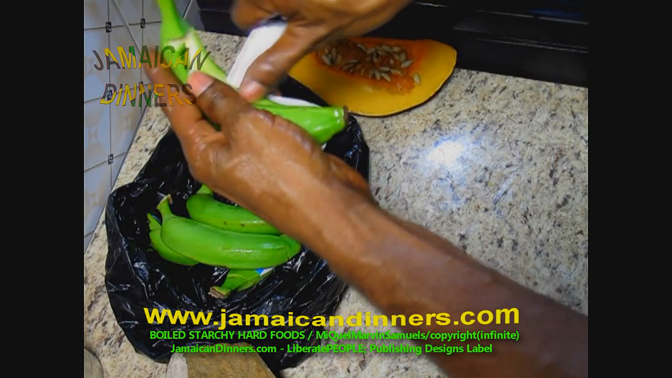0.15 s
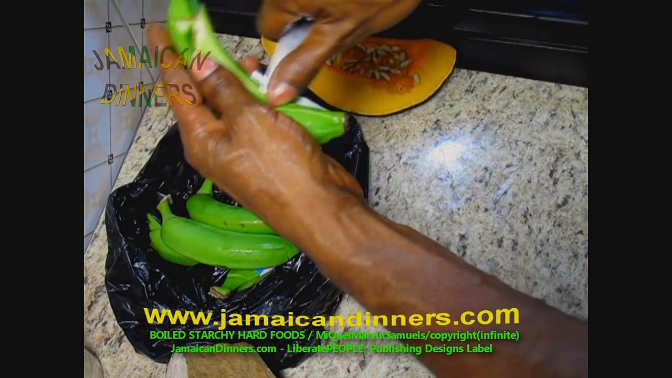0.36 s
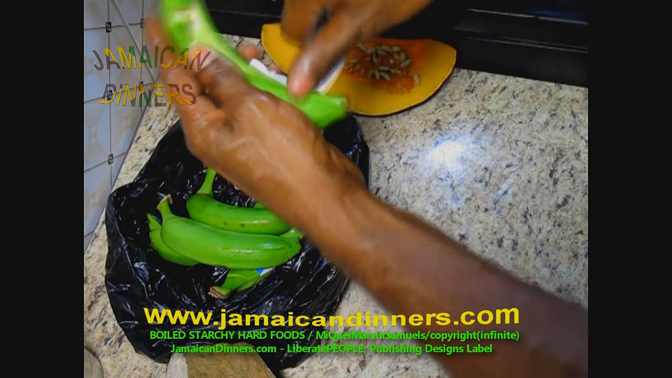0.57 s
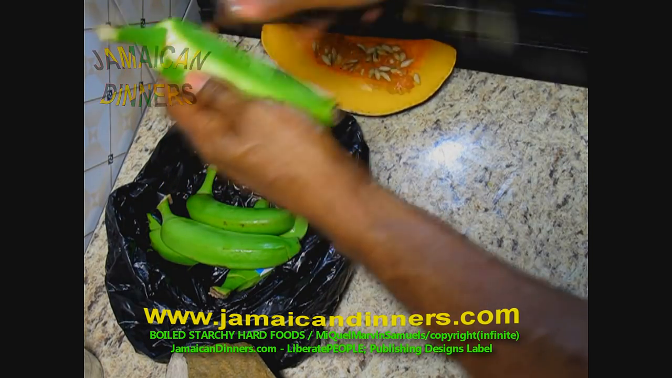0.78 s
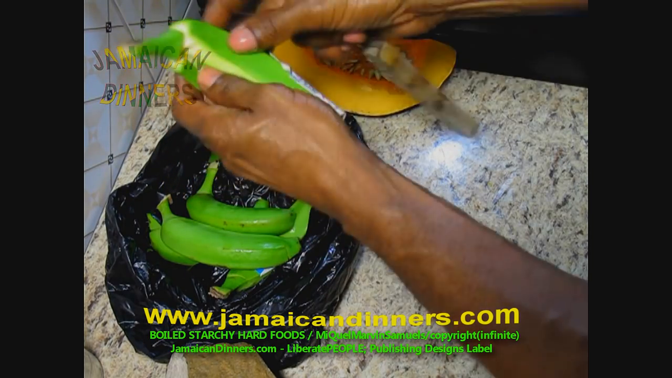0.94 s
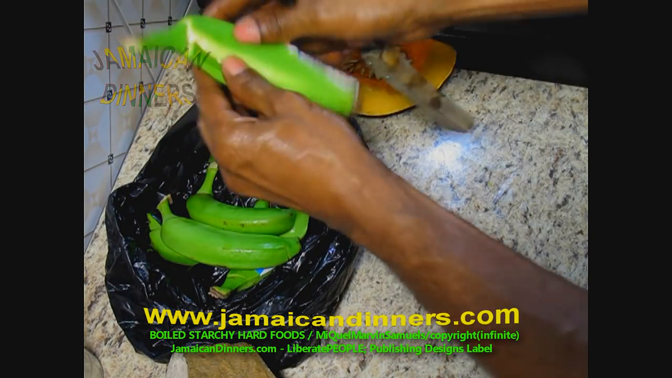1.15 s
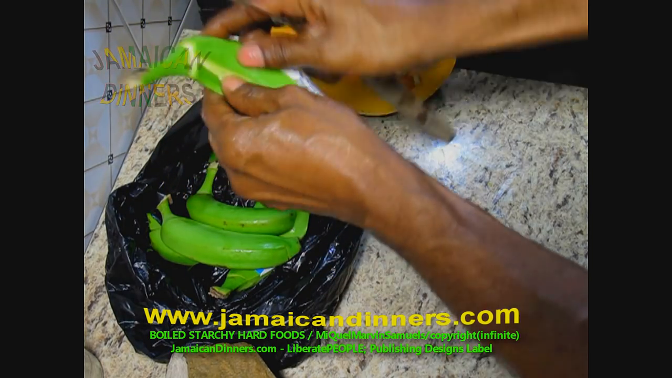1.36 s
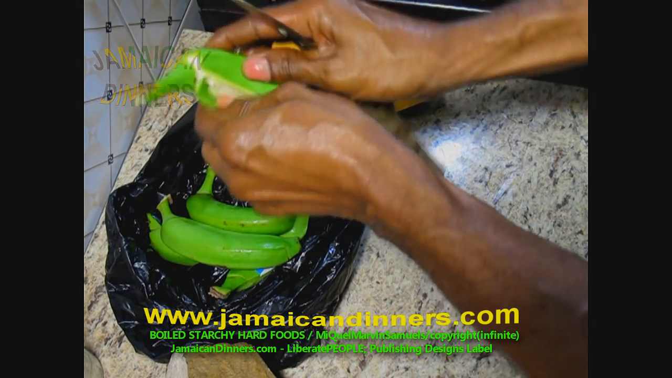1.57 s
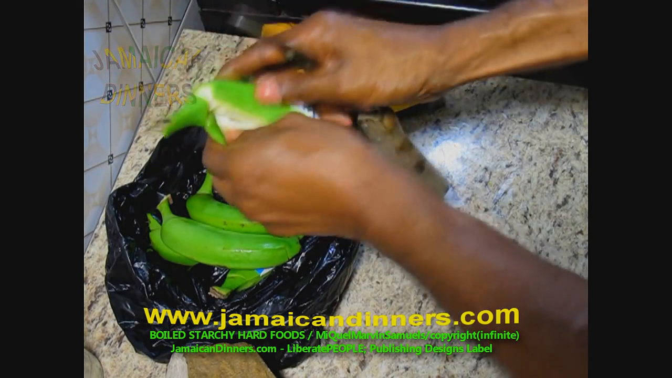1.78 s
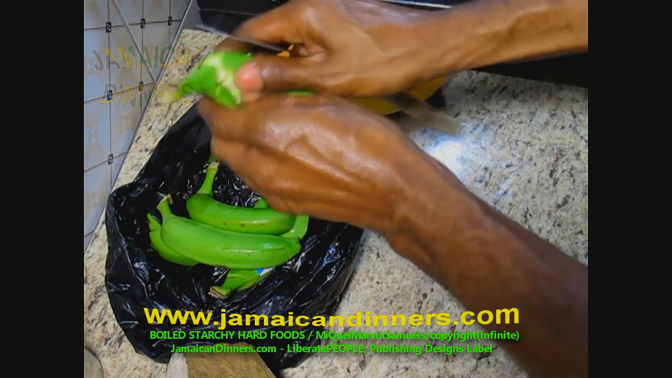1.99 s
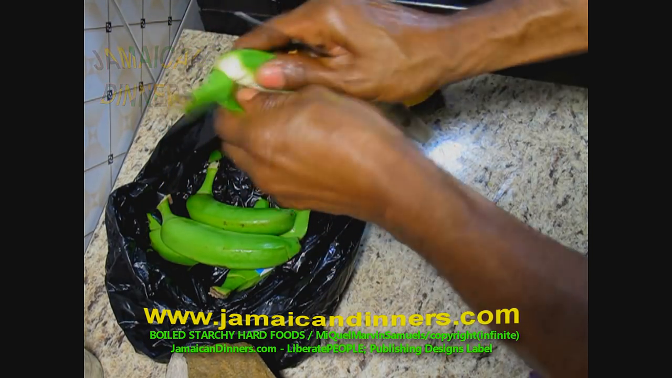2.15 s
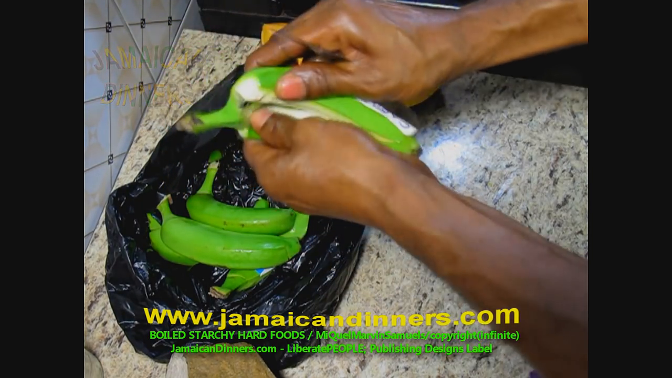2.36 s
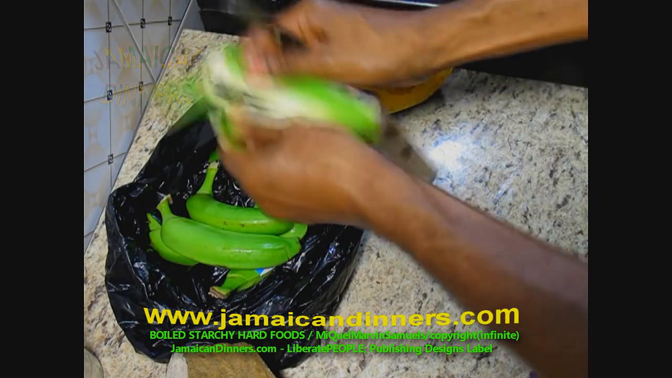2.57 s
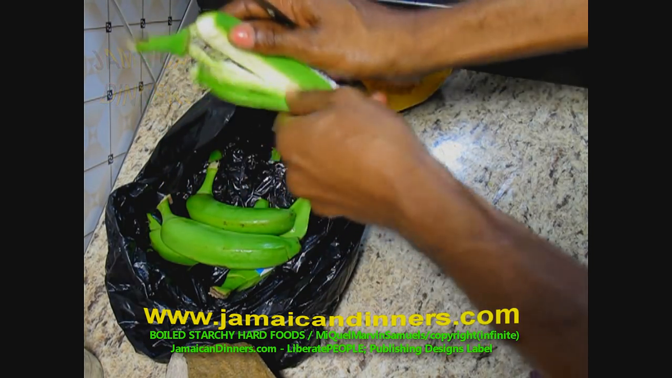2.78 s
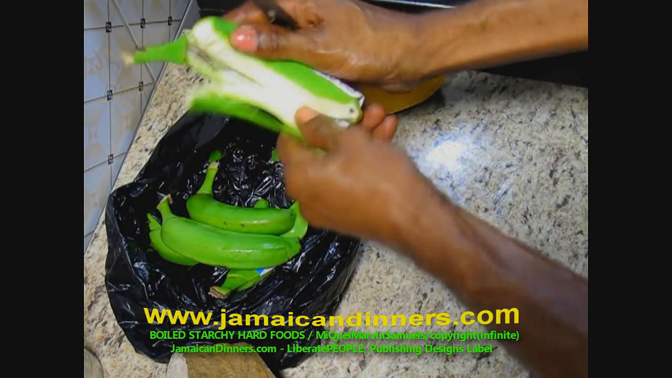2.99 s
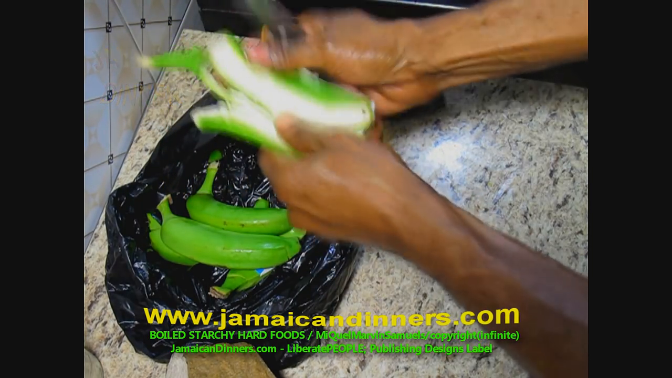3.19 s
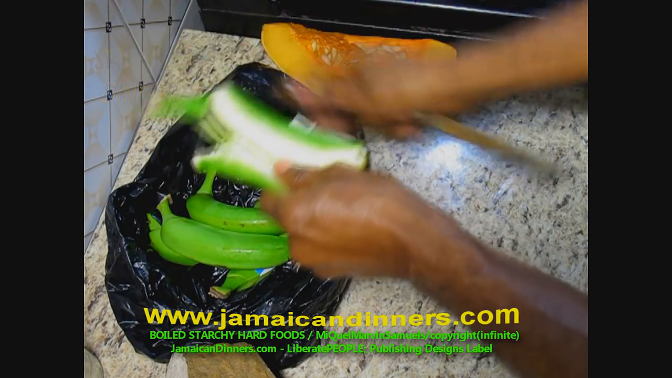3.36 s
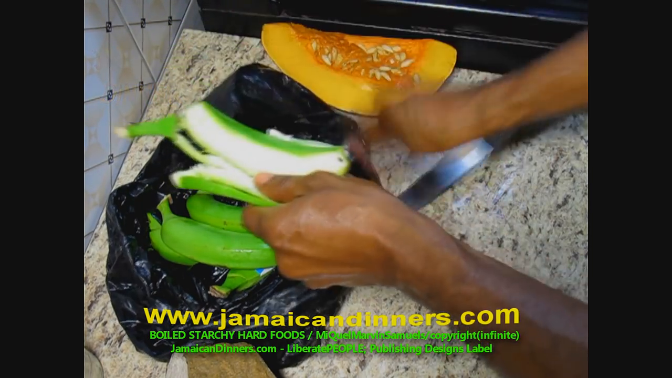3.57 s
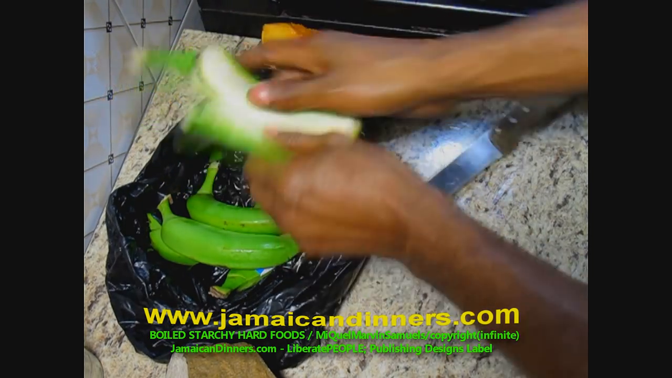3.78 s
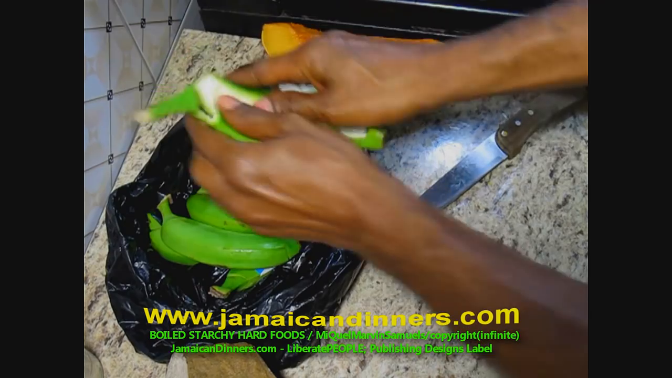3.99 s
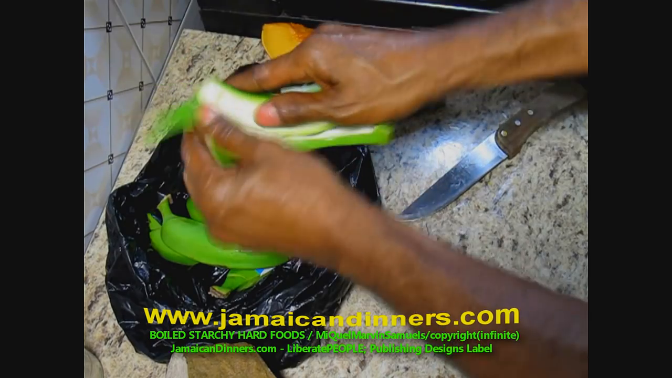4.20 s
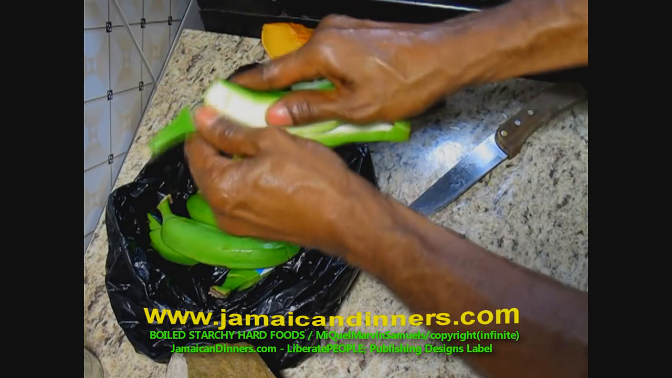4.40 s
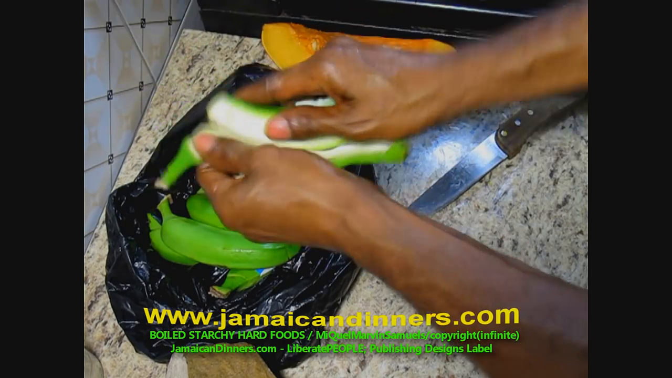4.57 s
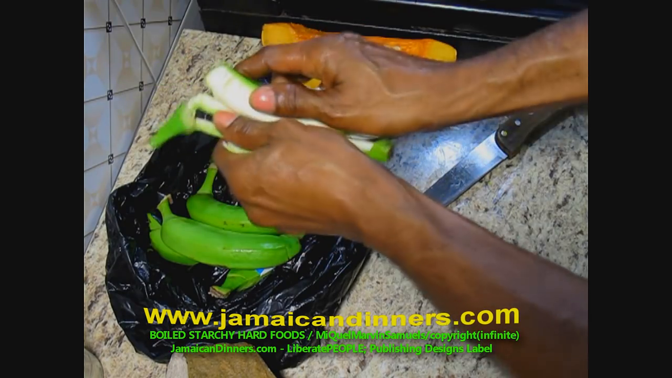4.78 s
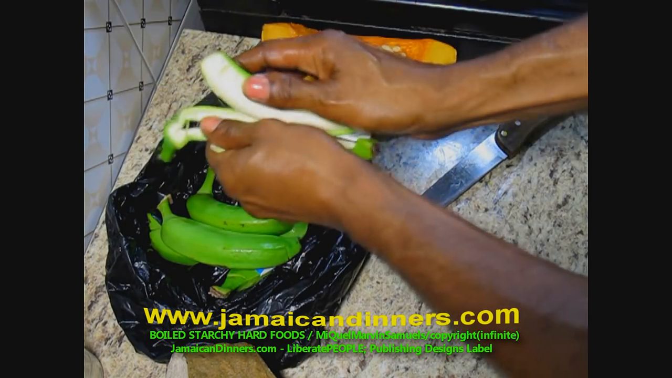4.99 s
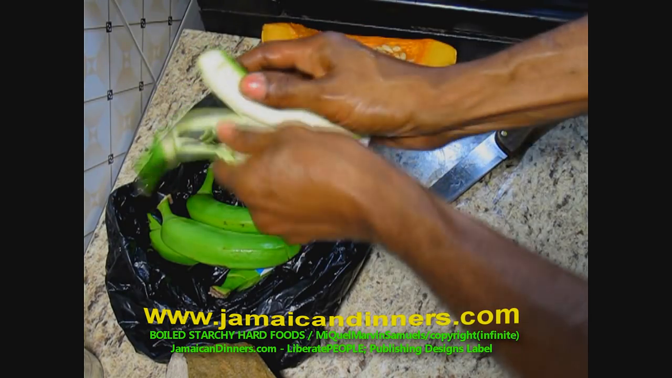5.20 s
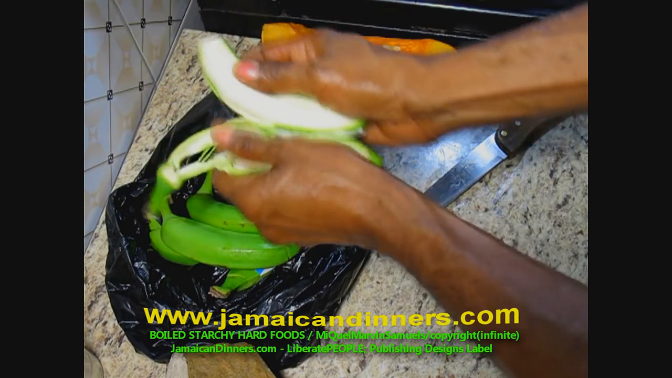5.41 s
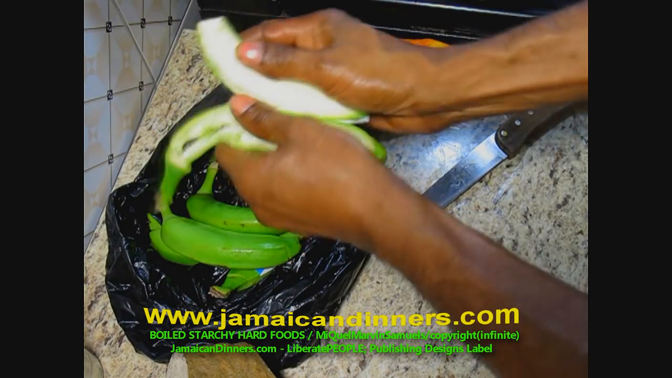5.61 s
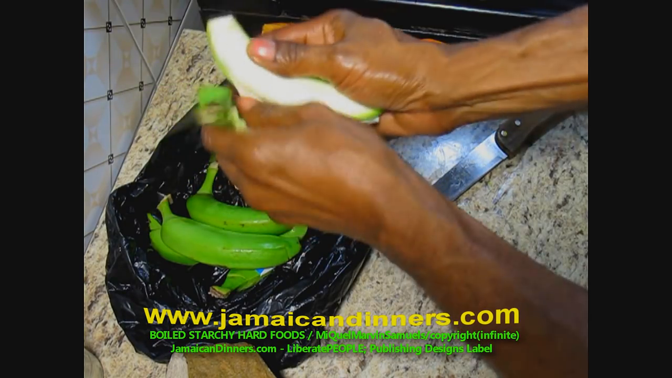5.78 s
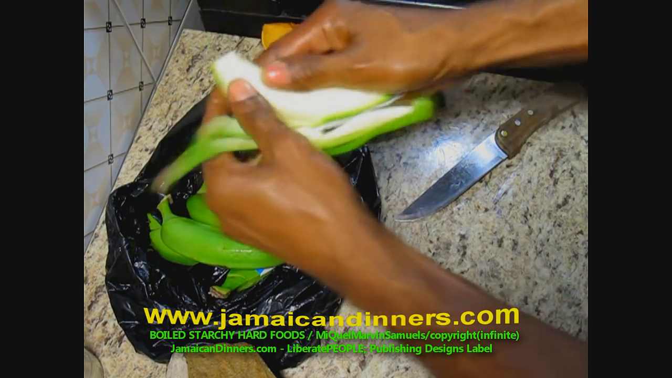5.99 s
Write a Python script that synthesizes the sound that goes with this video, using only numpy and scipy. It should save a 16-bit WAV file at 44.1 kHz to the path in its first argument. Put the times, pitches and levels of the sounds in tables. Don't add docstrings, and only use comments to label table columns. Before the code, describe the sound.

In a quiet kitchen with faint fridge hum and hiss, fingers softly pat and tear a thick green banana skin. Crackles and snaps grow into short, crisp rips. Midway a knife drops on the stone counter, bounces, skids and rattles to rest, by far the loudest event. Tearing then resumes in bursts, strongest near the end, before fading to small ticks. Close small camera, slightly dull and gritty, with a short room tail.

```python
import sys
import numpy as np
from scipy import signal
from scipy.fft import rfft, irfft
from scipy.io import wavfile
from scipy.ndimage import uniform_filter1d

SR = 44100
rng = np.random.default_rng(int(sys.argv[2]) if len(sys.argv) > 2 else 0)


def gain_from_decibels(decibels):
    exponent = np.asarray(decibels, float) / 20
    return 10 ** exponent


def wav_record(signal):
    frames = np.transpose(np.atleast_2d(signal))
    bounded = np.clip(frames, -1, 1)
    quanta = np.round(bounded * 32767).astype(np.int16)
    wavfile.write(sys.argv[1], SR, quanta)


N = 266805

# f/Hz, width/Hz, level/dB
CRACK_PEAKS = [(5740, 3220, -8), (7560, 2000, -2), (9880, 1760, -1)]
# f/Hz, level/dB, time to fall 60 dB/s
HANDLE_MODES = [(740, -13, .04), (884, 0.5, 0.062), (1014, -7, 0.092), (1170, 2, 0.038), (1530, 3, 0.028),
                (1770, 13.5, 0.013), (2050, 10, 0.022), (2440, 9.5, 0.024)]
# f/Hz, level/dB, time to fall 60 dB/s
EDGE_MODES = [(7830, 0, 0.029), (10260, 10, 0.017)]


def level(x, db):
    return x * gain_from_decibels(db) / np.sqrt(np.mean(x ** 2))


def band(x, lo_hz, hi_hz, order=2):
    return signal.sosfilt(signal.butter(order, [lo_hz, hi_hz], "band", fs=SR, output="sos"), x)


def resonator(hz, width_hz):
    r = np.exp(-np.pi * width_hz / SR)
    poles = [1, -2 * r * np.cos(2 * np.pi * hz / SR), r * r]
    return np.array([1, 0, -1]) * (1 - r * r) / 2, poles


def body(x, peaks):
    out = 0
    for k, (hz, width_hz, db) in enumerate(peaks):
        out = out + (-1) ** k * gain_from_decibels(db) * signal.lfilter(*resonator(hz, width_hz), x)
    return out


def sweep(x, hz, sharp):
    out, state, size = np.zeros(N), np.zeros(2), 256
    for at in range(0, N, size):
        zeros, poles = resonator(hz[at], hz[at] / sharp)
        out[at:at + size], state = signal.lfilter(zeros, poles, x[at:at + size], zi=state)
    return out


def ring(x, modes, scatter_db=6.0):
    out = 0
    for hz, db, t60 in modes:
        actual_hz = hz * (1 + 0.016 * rng.standard_normal())
        pole = np.exp(2j * np.pi * actual_hz / SR - np.log(1000) / (t60 * SR))
        strength = gain_from_decibels(db + scatter_db * rng.standard_normal())
        out = out + strength * signal.lfilter([1], [1, -pole], x).imag
    return out * x.std() / out.std()


def grains(rate, spread_db, smooth_db):
    when, size, noise = rng.random(N), rng.exponential(size=N), rng.standard_normal(N)
    ticks = (when < rate / SR) * gain_from_decibels(spread_db * np.minimum(size, 3.2)) * np.sign(noise)
    return level(level(ticks, 0) + level(rng.standard_normal(N), smooth_db), 0)


def blows(rows, voices, tick, ragged_db=3.5):
    span = 3072
    out, t = np.zeros(N + span), np.arange(span) / SR
    for s, db, rel_a, rel_b, t60, *hz in rows:
        unevenness = np.repeat(rng.standard_normal(span // 32), 32) * np.minimum(t / 0.0041, 1)
        ragged = rng.standard_normal(span) * gain_from_decibels(ragged_db * unevenness)
        burst = ragged * np.exp(-np.log(1000) * t / np.clip(t60, .003, .08))
        burst *= 1 + 0.56 * np.exp(-t / 0.0021)
        burst[0] += tick
        at = int(s * SR)
        for voice, part_db in zip(voices, (db, db + rel_a, db + rel_b)):
            sound = voice(burst, *hz)
            out[at:at + span] += sound * gain_from_decibels(part_db) / np.abs(sound).max()
    return out[:N]


def singing(rows, sharp):
    damping_hz, strike = 134, 7.4
    out, t = np.zeros(N + SR), np.arange(4410) / SR
    for s, length, db, hz in rows:
        unevenness = np.repeat(rng.standard_normal(len(t) // 45), 45)
        ticks = rng.standard_normal(len(t)) * gain_from_decibels(2.3 * unevenness)
        ticks[10] += strike
        fade = gain_from_decibels(-6 * t / length - 1400 * np.maximum(t - length, 0))
        shape = np.minimum(t / 0.00046, 1) * fade
        peak = [(hz, hz / sharp + damping_hz, 0)]
        note = body(body(ticks * shape, peak), peak)
        at = int(s * SR)
        out[at:at + len(t)] += level(note, db) * np.sqrt(length / t[-1])
    return out[:N]


def background():
    # f/Hz, level/dB
    hiss_colour = np.array([(20, -5), (60, -6), (150, -7), (330, -8.5), (600, -12), (1500, -14.5),
                            (2100, -15.5), (4000, -19), (7000, -23), (9800, -19), (11000, -25)])
    hum_hz, whine_hz = 99.9, 5910
    hiss_db, hum_db, whine_db = -56.5, -58.5, -73
    t, hz = np.arange(N) / SR, np.fft.rfftfreq(N, 1 / SR) + 1
    shape_db = np.interp(np.log(hz), np.log(hiss_colour[:, 0]), hiss_colour[:, 1])
    hiss = irfft(rfft(rng.standard_normal(N)) * gain_from_decibels(shape_db), N)
    waver = level(band(rng.standard_normal(N), hum_hz - 4, hum_hz + 4), -17.5)
    hum = np.sqrt(2) * np.sin(2 * np.pi * hum_hz * t) + waver
    whine = np.sin(2 * np.pi * whine_hz * t)
    return level(hiss, hiss_db) + level(hum, hum_db) + level(whine, whine_db)


def pulls():
    # peak t/s, crackle level/dB, build-up per 30 dB/s, skin relative level/dB, flap f/Hz
    rips = [(0.536, -42, 0.08, -6, 2200), (.68, -49.5, 0, -6.5, 3290), (2.829, -55, -0.36, -1, 3500),
            (1.74, -31, 0, -12.5, 3980), (1.95, -57.5, .11, 1, 3700), (2.182, -39.5, -0.04, -8, 3500),
            (2.257, -37, -0.03, -3.5, 3730), (2.319, -37.5, 0.04, -3, 2750), (2.397, -42.5, 0, -3, 3450),
            (2.502, -34.5, -0.0141, -7.5, 2280), (2.568, -40, 0.21, -7, 2060),
            (3.018, -30, 0.1043, -7, 3360), (3.266, -30, 0.0435, -7, 3850),
            (4.585, -38.5, 0.12, -11.5, 3830), (4.64, -46, 0.36, -13, 4500), (5.015, -46, -0.08, -8, 3400),
            (5.092, -59, 0.5, -10, 4000), (5.363, -31.5, 0.0653, -3, 2440), (5.724, -57, 0.16, -6, 2590),
            (5.303, -29.5, 0.05, -11.5, 2530), (6.006, -59.5, 1, -8, 2990)]
    # start t/s, length/s, crackle level/dB, skin relative level/dB, flap f/Hz
    drags = [(0.06, 0.079, -54.5, -1.5, 2080), (0.21, 0.06, -56.5, -2, 2190),
             (0.304, 0.12, -59.5, -6.5, 2490), (0.976, 0.025, -54, -4.5, 4600),
             (1.508, 0.15, -50.5, -12.5, 3500), (4.422, 0.11, -49.5, -12, 3850),
             (5.836, 0.027, -43.5, -15, 4600), (1.606, 0.15, -42.5, -15, 4000),
             (2.003, 0.07, -57, -8, 2800), (2.159, .025, -46.5, -6.5, 3400), (2.283, 0.022, -38, -10, 3000),
             (2.37, 0.033, -41, -9.5, 2790), (2.726, 0.022, -57, -6, 3480),
             (4.958, 0.093, -43.5, -12.5, 3700), (2.412, 0.035, -42.5, -8.5, 2760),
             (2.643, 0.045, -59, -7, 2880), (3.105, .13, -56.5, -6, 3400), (3.308, 0.061, -56.5, -1, 3800),
             (4.7, 0.11, -60, -8, 2760), (4.888, 0.061, -36.5, -12.5, 4000), (5.172, 0.16, -53, -5, 3000),
             (5.33, 0.031, -33, -13, 2500), (5.44, 0.1, -58.5, -3, 2600)]
    drag_attack_s, build_curve, release_db_per_s = 0.027, 1.33, 337
    t = np.arange(0, N + 64, 64) / SR
    rows = [(s, 0, db, rise, *rest) for s, db, rise, *rest in rips]
    rows += [(s, hold, db, drag_attack_s, *rest) for s, hold, db, *rest in drags]
    s, hold, db, rise, skin_db, flap_hz = np.array(rows).T[:, :, None]
    early, late = np.maximum(s - t, 0), np.maximum(t - s - hold, 0)
    build_db = 30 * (early / np.maximum(rise, .005)) ** build_curve
    power = gain_from_decibels(np.maximum(db - build_db - release_db_per_s * late, -150)) ** 2
    total = power.sum(0)
    crackle_db = 10 * np.log10(total)
    skin_share_db = (power * skin_db).sum(0) / total
    flap_pitch_hz = (power * flap_hz).sum(0) / total
    return [np.interp(np.arange(N) / SR, t, c) for c in (crackle_db, skin_share_db, flap_pitch_hz)]


def tearing():
    # f/Hz, width/Hz, level/dB
    skin_peaks = [(2210, 860, -4.5), (1080, 550, -11.5), (3700, 3700, -6), (5720, 2830, -1)]
    crackle_db, skin_db, flap_hz = pulls()
    fibres = grains(rate=3000., spread_db=4.0, smooth_db=-6.0)
    coarse = fibres + grains(rate=1300.0, spread_db=4.5, smooth_db=-7.5)
    patch_hz = np.repeat(4500 + 5500 * rng.random(N // 1024 + 1), 1024)[:N]
    bright = level(body(fibres, CRACK_PEAKS), -1.3) + level(sweep(fibres, patch_hz, 4.8), -13.0)
    skin = level(body(coarse, skin_peaks), 0.57) + level(sweep(coarse, flap_hz, 4.5), -7.5)
    return gain_from_decibels(crackle_db - 1.5) * (bright + gain_from_decibels(skin_db) * skin)


def snaps():
    # t/s, crack level/dB, flap relative level/dB, 60 dB fall/s
    thick_snaps = [(.0418, -46, 1, 0.034), (4.685, -47, 3, .02), (.535, -45, 6, .05),
                   (.976, -40, -4.5, 0.031), (1.1506, -54, 13, .023), (1.943, -38.5, -2.5, 0.043),
                   (2.148, -43, -12, .02), (2.3165, -21, -1, 0.028), (2.3693, -33, -14, .023),
                   (2.4204, -29.5, -2, 0.046), (2.5603, -23, -0.5, 0.022), (2.6517, -42, -1, 0.039),
                   (2.944, -32, -3, 0.051), (2.9697, -36, 1, 0.018), (3.015, -14, -3, 0.0088),
                   (3.025, -22, -1, 0.026), (4.905, -27, -9, 0.02), (4.926, -36.5, 7, 0.025),
                   (5.009, -17.5, -7.5, 0.021), (5.1432, -24.5, -16, 0.045), (5.1659, -28.5, 2.5, 0.029),
                   (5.2058, -26, -1.5, 0.038), (5.151, -41.5, 10.5, .02), (5.265, -29.5, -11, 0.023),
                   (5.33, -20.5, -4, .02), (5.2923, -16.5, -5.5, 0.061), (5.3602, -11.5, -7, 0.012),
                   (5.8605, -30, -17, 0.05)]
    # t/s, crack level/dB, flap relative level/dB, 60 dB fall/s
    thin_snaps = [(.671, -31.5, -21, 0.033), (.7877, -31, -5, 0.024), (1.2541, -46.5, 7, 0.0058),
                  (1.5237, -43, -3, .02), (1.614, -34, -13, 0.037), (1.6798, -31, -18, .02),
                  (1.7332, -17, -6, 0.011), (1.7455, -24.5, -3.5, 0.023), (2.1795, -21, -6.5, 0.025),
                  (2.2545, -25.5, -5, 0.03), (2.2893, -32, -5.5, 0.045), (2.395, -21.5, -23, .022),
                  (2.527, -30.5, 1.5, 0.013), (2.824, -46, -1, 0.05), (2.9868, -19, -7, 0.062),
                  (3.0779, -28.5, -12, .023), (3.242, -25.5, -2.5, 0.055), (3.248, -15, 0.5, 0.059),
                  (3.2682, -7, -4, 0.017), (3.276, -35, 8, 0.09), (4.0893, -43, -3, 0.022),
                  (4.4938, -33, 0.5, 0.022), (4.5164, -31.5, -4, 0.04), (4.5284, -26, -10, 0.047),
                  (4.557, -32.5, -4, 0.018), (4.6438, -29, -12, 0.042), (5.3557, -16.5, -4, .012)]
    # t/s, crack level/dB
    dry_ticks = [(1.624, -28), (1.6427, -32), (1.696, -29), (2.4929, -24), (2.7195, -44), (2.922, -49),
                 (3.116, -34.5), (3.226, -36), (4.431, -29), (4.5765, -25), (4.601, -31), (4.8496, -41),
                 (4.864, -32), (4.882, -35), (4.9406, -26), (4.9552, -20.5), (4.989, -29), (5.044, -24.5),
                 (5.2868, -24), (5.7158, -37.5), (5.8365, -33), (5.9725, -45), (5.998, -36.5), (1.663, -36),
                 (4.462, -42), (4.978, -28), (5.35, -24), (2.567, -25.5), (2.302, -27), (2.458, -31.5),
                 (2.249, -38), (2.262, -32), (5.25, -42), (3.037, -31)]
    thick_hz, thin_hz, flap_width = 2200, 3800, .12
    flesh_db, tick_flap_db, tick_t60_s = -45, -37, 0.03

    def crack(x, hz):
        return body(x, CRACK_PEAKS)

    def flap(x, hz):
        return body(x, [(hz, flap_width * hz, 0)]) + .5 * band(x, 1960, 5740)

    def flesh(x, hz):
        return band(x, 250, 1600)

    rows = [(s, db, flap_db, flesh_db, t60, thick_hz) for s, db, flap_db, t60 in thick_snaps]
    rows += [(s, db, flap_db, flesh_db, t60, thin_hz) for s, db, flap_db, t60 in thin_snaps]
    rows += [(s, db, tick_flap_db, flesh_db, tick_t60_s, thin_hz) for s, db in dry_ticks]
    return blows(rows, (crack, flap, flesh), tick=2.4)


def singing_strips():
    strips = [(.068, 0.018, -60, 2050), (.215, .03, -64, 2050), (.51, .05, -52, 2240),
              (1.612, 0.021, -45, 9300), (1.613, .025, -57, 3500), (1.645, 0.003, -37, 9500),
              (1.70, 0.033, -45.5, 10200), (1.70, 0.025, -52, 6300), (2.168, .01, -42, 9550),
              (2.185, 0.0094, -48, 3940), (2.29, 0.006, -42, 6100), (2.315, .005, -31, 8300),
              (2.742, 0.02, -57, 3800), (2.325, 0.02, -54, 2860), (2.421, .004, -34, 10000),
              (2.493, 0.021, -40.5, 8950), (2.503, 0.017, -45, 2180), (2.555, 0.021, -40.5, 10100),
              (2.968, .012, -43.5, 2330), (2.985, 0.015, -41, 4330), (3.0, 0.0078, -39, 2070),
              (3.014, 0.0036, -27, 8260), (2.92, .025, -55, 3500), (3.045, 0.01, -44, 2370),
              (3.25, 0.06, -39, 3800), (3.248, .012, -34, 7000), (4.51, 0.025, -51, 5600),
              (4.555, 0.031, -46.5, 4096), (4.55, 0.083, -45, 9700), (4.595, 0.027, -56, 1980),
              (4.643, 0.006, -48, 5400), (4.863, .07, -45.5, 9400), (4.885, .04, -51, 5300),
              (4.902, 0.027, -41, 7200), (4.973, 0.008, -39, 9500), (5.009, 0.011, -33, 7240),
              (5.054, .006, -40, 9350), (5.293, .006, -31, 6750), (5.292, 0.012, -37, 5200),
              (5.30, 0.083, -37, 9440), (5.326, 0.014, -43, 2100), (5.361, 0.008, -36.5, 2420),
              (5.362, 0.011, -36, 5130), (5.374, 0.0035, -38, 2800), (5.37, 0.033, -49, 1160),
              (3.267, .004, -20, 10500), (.788, 0.0089, -55, 3900), (5.009, .006, -32, 4700),
              (1.15, .004, -54, 2520), (5.356, 0.016, -50, 400)]
    return singing(strips, sharp=8.2)


def finger_pats():
    # t/s, level/dB, f/Hz
    pats = [
        (0.254, -49, 1360),
        (0.259, -47, 610),
        (0.356, -45, 990),
        (0.275, -50, 650),
        (0.541, -46, 1400),
        (0.649, -48, 2050),
        (1.089, -50, 740),
        (1.9765, -44.5, 2600),
    ]
    rows = [(s, db, 0, 0, .03, hz) for s, db, hz in pats]
    return blows(rows, [lambda x, hz: band(x, 0.81 * hz, 1.23 * hz)], tick=1.9)


def clicks():
    # t/s, peak level/dB, f/Hz, length/cycles
    contacts = [(0.7879, -30, 3700, 2.5), (.7935, -38, 9500, 5), (2.7195, -43, 2700, 4),
                (.2545, -46, 1200, 3), (.358, -42, 1250, 3), (3.0148, -17, 7450, 3), (1.7333, -14, 8500, 3),
                (2.318, -14, 2900, 2.5), (4.6015, -29, 10500, 6), (3.5924, -1, 1940, 2.3),
                (3.6022, -17, 1600, 2.5), (3.6483, -7.5, 4300, 3.9), (3.7405, -12, 2600, 1.5),
                (3.7703, -6, 3570, 2), (3.7835, -10.5, 2800, 4), (3.8707, -6.5, 4300, 3),
                (3.8725, -15, 1550, 3.7), (3.9255, -17, 4100, 5), (4.9408, -25, 8000, 6),
                (4.956, -20, 7600, 5.5), (4.9738, -25, 9400, 8), (4.9786, -24, 9500, 8),
                (5.0096, -22.5, 2140, 4.3), (5.2948, -23, 2130, 4), (5.3257, -24, 5000, 2),
                (5.3556, -17, 2310, 2.5), (5.3599, -11, 2400, 2.8), (5.3602, -13.5, 4920, 5.2),
                (5.3662, -18, 3430, 5.6), (5.3748, -25, 2300, 3.3)]
    out, t = np.zeros(N + SR), np.arange(1024) / SR
    for s, db, hz, cycles in contacts:
        age = 4 * hz * t / np.clip(cycles, 1, 20)
        swell = age * np.exp(-age)
        push = band(np.sin(2 * np.pi * hz * t) * swell, .6 * hz, min(2 * hz, 12000))
        at = int(s * SR)
        out[at:at + len(t)] += gain_from_decibels(db) * push / np.abs(push).max()
    return out[:N]


def flesh_thuds():
    # t/s, level/dB
    deep_cracks = [(.497, -42), (1.7332, -51), (2.9868, -40.5), (3.2425, -35), (3.255, -35), (3.2682, -34),
                   (4.9089, -45.5), (5.3555, -34.5), (5.36, -33), (2.316, -44), (3.014, -54)]
    rows = [(s, db, 0, 0, .022) for s, db in deep_cracks]
    return blows(rows, [lambda x: band(x, 250, 1600)], tick=2.4)


def knife_blows():
    # f/Hz, level/dB, time to fall 60 dB/s
    blade_modes = [(2880, 2, 0.013), (3480, -3, 0.018), (4600, -36, 0.017), (5300, -11, 0.013),
                   (6140, -1, 0.017)]
    # t/s, handle level/dB, blade relative level/dB, edge relative level/dB, 60 dB fall/s
    knocks = [(3.558, -47, 9, 15, .04), (3.5615, -41.5, 9, 12, .03), (3.568, -44, 15, 19, 0.048),
              (3.5925, -11.5, -2.5, -18, 0.055), (3.597, -22, -15, -33, .02), (3.616, -13, -20, -16, 0.05),
              (3.6465, -16.5, 10, 13, 0.018), (3.6485, -19, 10, 16.5, 0.032), (3.655, -32, 10, 10, 0.055),
              (3.733, -22, -5, -15, 0.061), (3.7409, -14, -2.5, -17, 0.058), (3.772, -19, -10, -28, 0.045),
              (3.78, -20, 10, 9, 0.055), (3.7835, -24, 13, 14.5, 0.047), (3.796, -19.5, -6, -8, 0.034),
              (3.838, -22.5, -10, -20, 0.079), (3.8605, -26.5, 13.5, 15, 0.057),
              (3.871, -10, 7.5, -20, 0.03), (4.006, -21.5, -7, -30, 0.045), (4.013, -28, 1, 5, 0.043)]
    # t/s, handle level/dB, blade relative level/dB, edge relative level/dB
    skids = [
        (3.635, -20, -8, -10),
        (3.88, -15, 2, -1.5),
        (3.918, -22, 2, -13),
        (3.9256, -20.5, 8, 11.5),
        (3.944, -19, -29, -22),
        (3.9758, -22.5, 3, -2),
        (4.0096, -26, 8.5, 7.5),
    ]
    # t/s, handle level/dB, blade relative level/dB, edge relative
    # level/dB, 60 dB fall/s
    more_knocks = [
        (3.771, -24, 15, 6, 0.025),
        (3.5935, -10.5, -10, -8, 0.012),
        (3.8708, -16, 7, -4, 0.01),
        (3.9257, -27, 15, 6, .008),
        (3.602, -12, -15, -20, 0.018),
        (3.812, -27, -8, -18, 0.022),
        (3.948, -22, 4, -15, 0.05),
    ]
    skid_t60_s, blade_ring = .083, .12

    def handle(x):
        return band(0.21 * ring(x, HANDLE_MODES) + band(x, 1030, 2700, order=1), 586, 3530, order=3)

    def blade(x):
        return band(blade_ring * ring(x, blade_modes) + x, 2850, 6140)

    def edge(x):
        return band(blade_ring * ring(x, EDGE_MODES) + x, 7370, 11600)

    rows = knocks + [(*row, skid_t60_s) for row in skids] + more_knocks
    return blows(rows, (handle, blade, edge), tick=6.4, ragged_db=2.0)


def knife_shivers():
    shivers = [(3.593, 0.003, -20, 2300), (3.594, 0.008, -28, 1600), (3.593, 0.028, -35, 830),
               (3.61, 0.015, -37, 2110), (3.634, 0.015, -33, 9600), (3.647, 0.0041, -20.5, 1550),
               (3.648, 0.0032, -17.5, 6100), (3.652, 0.012, -26.5, 10100), (3.77, 0.0075, -24.5, 1580),
               (3.786, 0.004, -25, 2700), (3.78, 0.017, -34.5, 1150), (3.86, 0.0053, -28, 5950),
               (3.878, 0.008, -36, 10000), (3.877, 0.022, -31.5, 1530), (3.895, 0.025, -38, 9300),
               (3.915, 0.021, -36.5, 950), (3.926, 0.051, -37.5, 9500), (3.926, 0.026, -37, 6700),
               (3.95, .012, -34, 6160), (3.8, 0.022, -47, 7800), (3.84, 0.0078, -34, 1500),
               (3.928, 0.012, -35, 4400), (3.885, 0.02, -41, 7900), (3.74, .01, -31, 3300),
               (3.976, 0.0092, -39, 2500), (4.01, 0.011, -38, 7840), (4.05, .09, -58.5, 415),
               (4.03, 0.027, -55, 1160), (3.593, 0.029, -30.5, 1020), (3.593, 0.022, -35.5, 604),
               (3.733, 0.039, -36, 610), (3.93, 0.01, -34, 2000), (3.94, 0.017, -42, 154),
               (3.838, 0.008, -31, 930), (3.7705, .002, -27, 5000), (3.781, .006, -25, 5500),
               (3.86, .01, -40, 8000)]
    return singing(shivers, sharp=9)


def knife_chatter():
    # t/s, level/dB
    chatter_levels = [(3.595, -32), (3.64, -30.5), (3.67, -34.5), (3.725, -37), (3.755, -28.5),
                      (3.8, -34.5), (3.83, -38.5), (3.855, -38), (3.883, -34), (3.915, -40.5), (3.955, -38),
                      (3.995, -46), (4.025, -47), (4.1, -61.5), (4.25, -77)]
    handle_down_s, rock_db = 3.732, 2
    boom_db, boom_follow, boom_t60_s = -44.5, 0.6, 0.14
    t = np.arange(N) / SR
    s, db = np.transpose(chatter_levels)
    inside = (t > s[0]) & (t <= s[-1])
    mute_db = 90 * (1 - uniform_filter1d(1. * inside, size=100))
    scrape_db = np.interp(t, s, db) - mute_db
    lifted_db = np.where(t < handle_down_s, -22, 0)
    handle_db = scrape_db + rock_db + lifted_db
    counter_db = boom_db + boom_follow * (scrape_db + 33.0 + lifted_db)

    contact = grains(rate=1500., spread_db=2.5, smooth_db=-33)
    rocking = level(band(0.31 * ring(contact, HANDLE_MODES) + contact, 383, 2040, order=3), 0)
    edge = 0.24 * ring(contact, EDGE_MODES, scatter_db=0.0)
    scrape = level(band(edge + contact, 1350, 17000), 0)

    rumble = band(rng.standard_normal(N), 53, 560)
    boom = level(body(rumble, [(158, 35, 3.5), (337, 280, -6.0), (85, 76, -8.0)]), -4.5)
    keep = gain_from_decibels(-60 / (boom_t60_s * SR))
    lingering = signal.lfilter([1 - keep], [1, -keep], gain_from_decibels(counter_db))
    boom = boom * (0.94 * gain_from_decibels(counter_db) + lingering)
    return gain_from_decibels(handle_db) * rocking + gain_from_decibels(scrape_db) * scrape + boom


def low_swell():
    thump_s, thump_db, width_s = 3.648, -36, .003
    return gain_from_decibels(thump_db) * np.exp(-((np.arange(N) / SR - thump_s) / width_s) ** 2)


def room(x):
    t60_s, tail_db = 0.18, -11
    t = np.arange(SR // 2) / SR
    noise = rng.standard_normal(len(t)) * (t > .004)
    low = band(noise, 100, 3000, order=1)
    tail = low * gain_from_decibels(-60 * t / t60_s) + (noise - low) * gain_from_decibels(-60 * t / (0.94 * t60_s))
    return signal.fftconvolve(x, tail * gain_from_decibels(tail_db) / np.sqrt(np.sum(tail ** 2)))[:N]


def scene():
    duck_db, duck_s = -23, 0.13
    fruit = tearing() + snaps() + singing_strips() + finger_pats() + flesh_thuds()
    knife = knife_blows() + knife_shivers() + knife_chatter() + low_swell()
    near = fruit + clicks() + knife
    keep = np.exp(-1 / (duck_s * SR))
    loudness = signal.lfilter([1 - keep], [1, -keep], np.abs(near))
    ducked = background() / (1 + (loudness / gain_from_decibels(duck_db)) ** 2)
    return (near + room(near) + ducked)[None]


def roll_off(x):
    return signal.sosfilt(signal.butter(12, 16800, fs=SR, output="sos"), x)


def record(dry):
    half_rate_hz, top_hz = 11760, 15780
    mirror_db, top_hiss_db = -16, -76
    rounded = 0.76 * np.tanh(dry[0] / 0.85)
    spectrum, hz = rfft(rounded), np.fft.rfftfreq(N, 1 / SR)
    fold = int(half_rate_hz * N / SR)
    high_hz = hz[fold:]
    mirrored = np.conj(spectrum[fold:0:-1][:len(high_hz)])
    image = gain_from_decibels(mirror_db - 3.0 * (high_hz - 13500) / 1000) * mirrored
    converter_hiss = level(band(rng.standard_normal(N), 11000, 16500, order=3), top_hiss_db)
    image = image + rfft(converter_hiss)[fold:]
    image = image / (1 + np.exp((11950 - high_hz) / 60)) * np.where(high_hz < top_hz, 1, gain_from_decibels(-49))
    spectrum = spectrum / (1 + np.exp(np.minimum((hz - 11250) / 170, 50)))
    spectrum[fold:] += image
    return roll_off(irfft(spectrum, N)[None])


dry = scene()
out = record(dry)
wav_record(out)
```